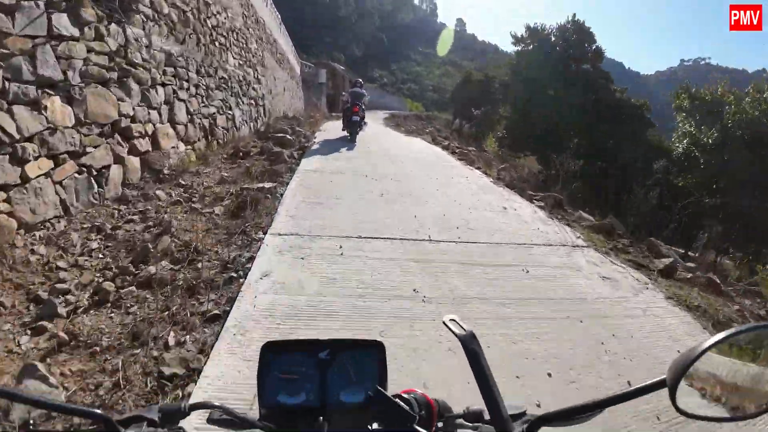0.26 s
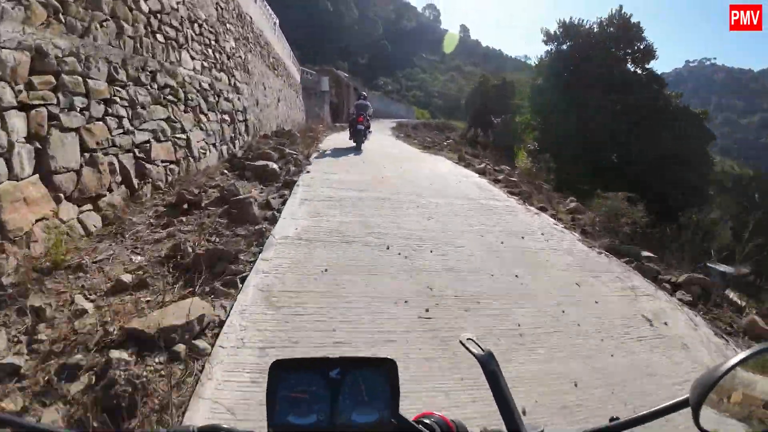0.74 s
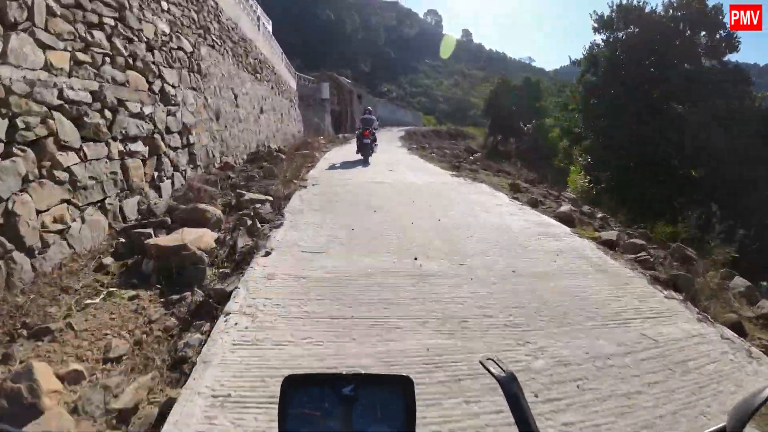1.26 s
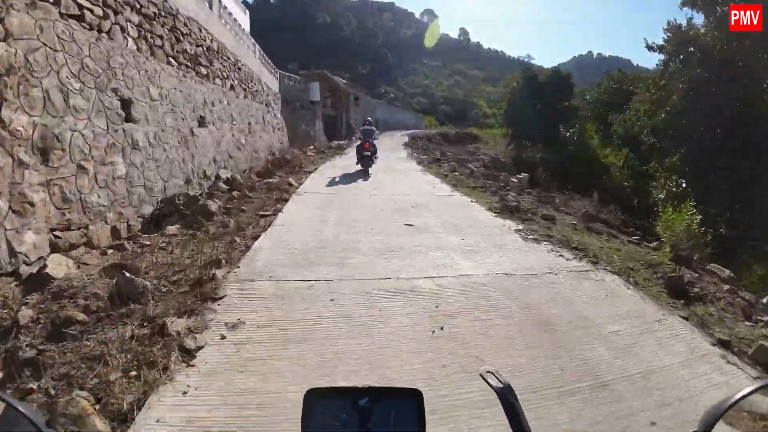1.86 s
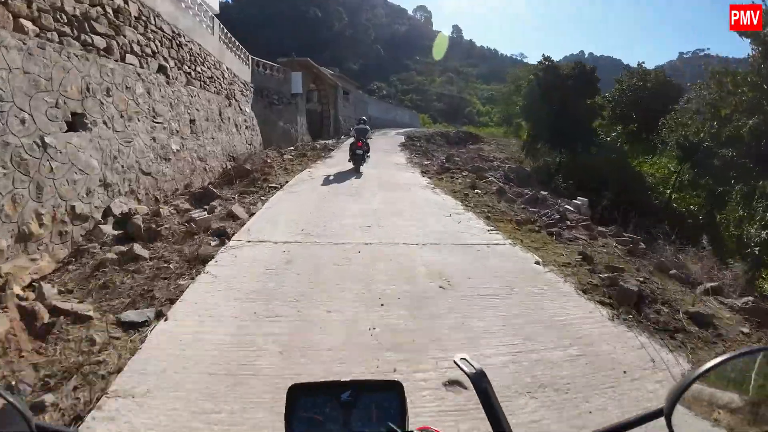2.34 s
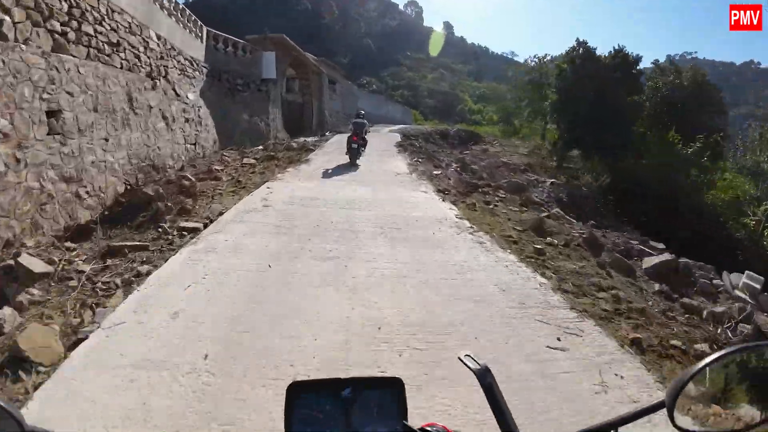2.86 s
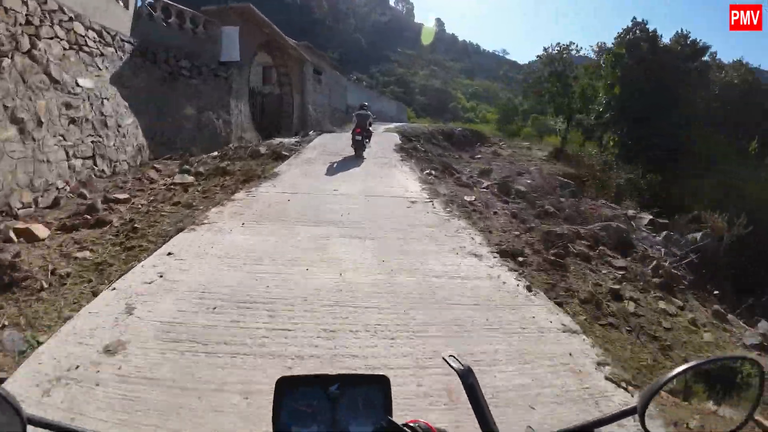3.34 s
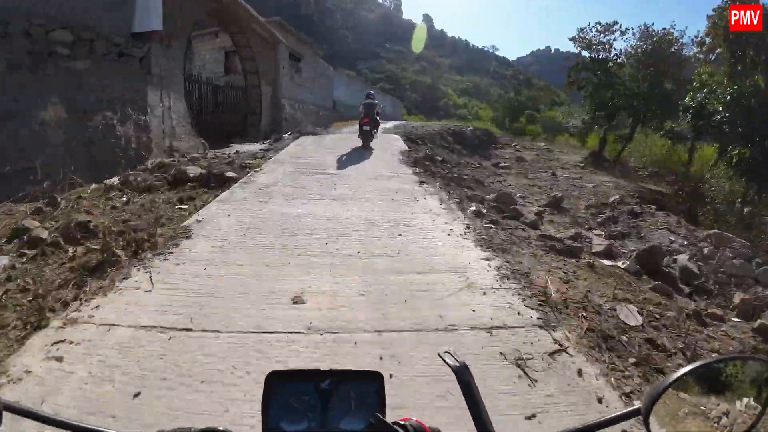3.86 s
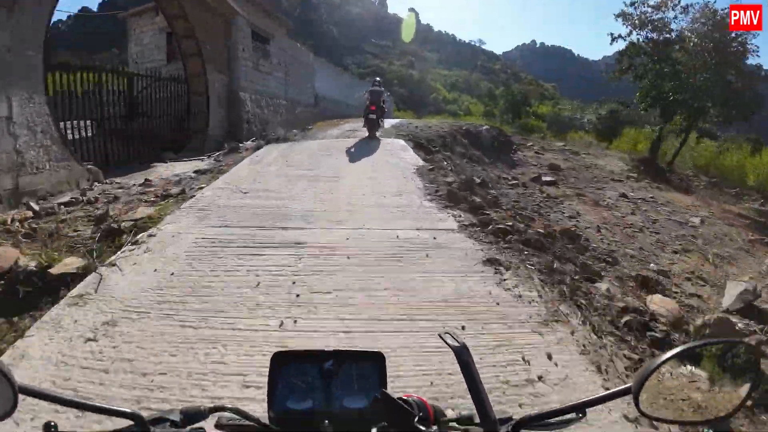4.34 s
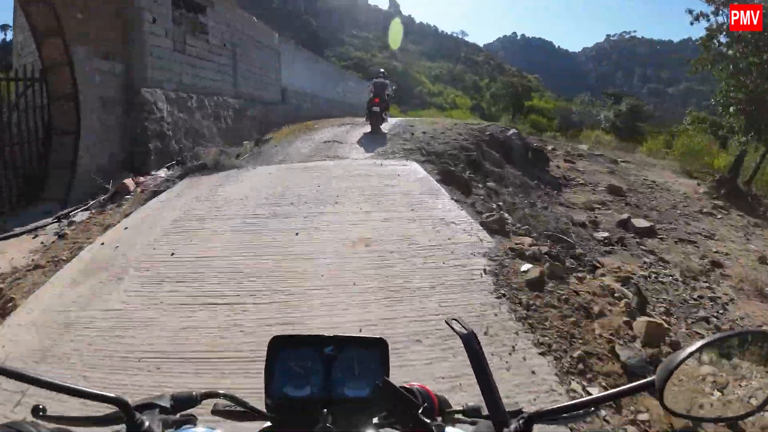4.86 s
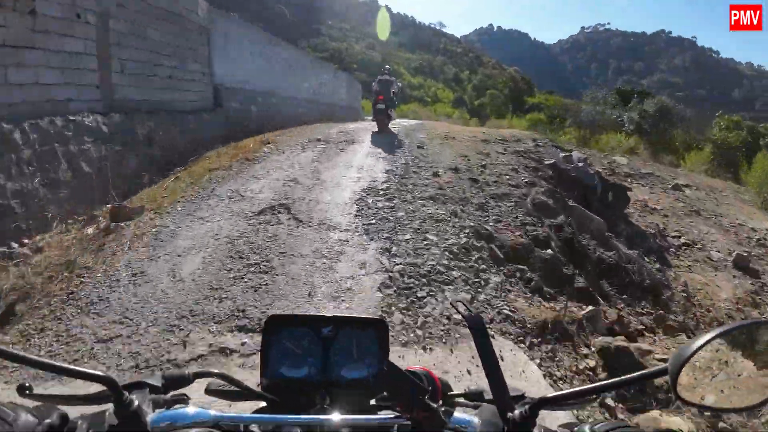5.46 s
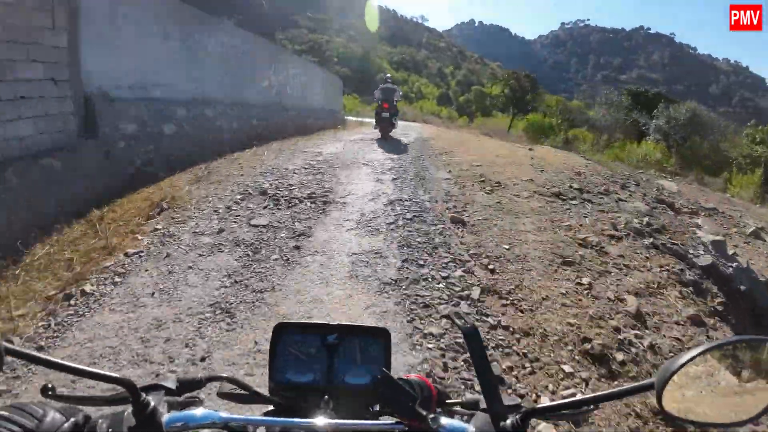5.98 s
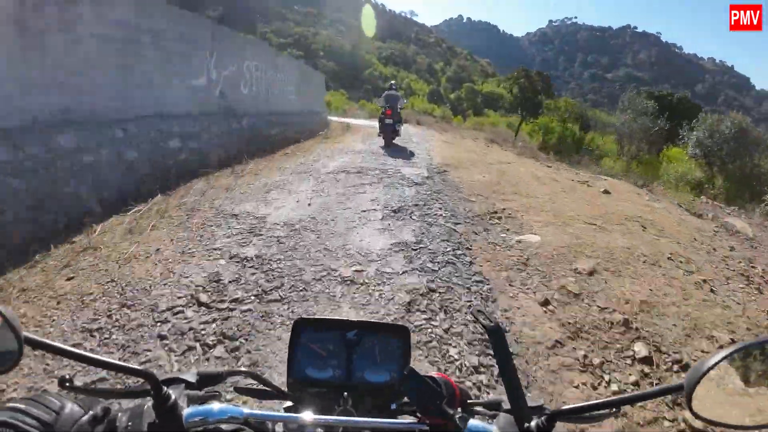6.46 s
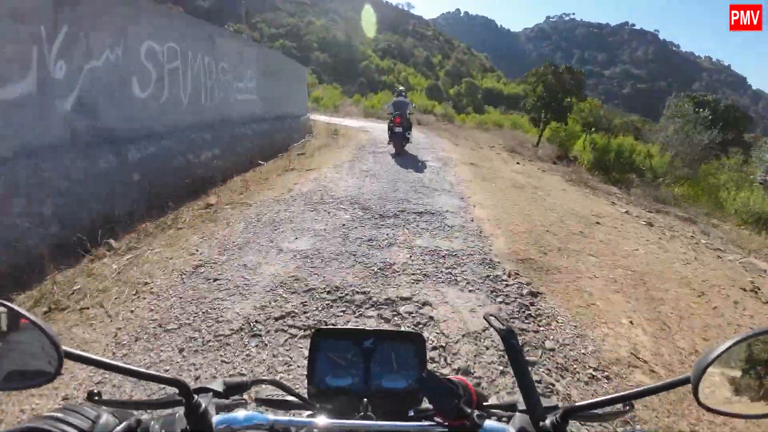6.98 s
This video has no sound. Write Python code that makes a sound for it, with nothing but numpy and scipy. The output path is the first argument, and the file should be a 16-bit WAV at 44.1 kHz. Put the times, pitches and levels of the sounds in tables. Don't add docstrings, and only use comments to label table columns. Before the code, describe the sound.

A small four-stroke single-cylinder motorcycle is heard close, from on board, in mono with a dulled, housed-camera tone. From 0 to 1.5 s the fast, throbbing exhaust revs up, growing louder and raspier. At about 1.55 s the throttle shuts: the bark drops out, leaving a hollow boom and singing cam chain as pitch slides down until about 2.3 s, with a brief rough falter near 2.1 s. The engine then pulls again with a fuller bark, rising gently until around 4.4 s, easing off with small stumbles, and sinking to a slightly uneven putter. Valve clatter, tappet ticks, gear whine and airy hiss track its speed over low tyre rumble. From about 5.6 s fine gravel spatters; stones knock the mudguard in a cluster at 5.8 s, once faintly at 6.05 s, and harder from 6.8 to 7.05 s, with tiny metallic pings. The engine continues to the end, about 7.2 s.

```python
import sys
import numpy as np
from scipy import signal
from scipy.fft import rfft, irfft, next_fast_len
from scipy.io import wavfile
from scipy.ndimage import uniform_filter1d, map_coordinates

SR = 44100
rng = np.random.default_rng(int(sys.argv[2]) if len(sys.argv) > 2 else 0)


def to_wav(s):
    ch = np.atleast_2d(s).T
    pcm = np.round(np.clip(ch, -1, 1) * 32767)
    wavfile.write(sys.argv[1], SR, pcm.astype(np.int16))


def volts(x):
    e = np.asarray(x, float) / 20
    return 10 ** e


N = 318351

# (time [s], rate [firings/s])
SPEED = [(0, 40), (.16, 39.5), (.66, 46.2), (.94, 49.2), (1.45, 57.7), (1.55, 56.9), (1.69, 51.5),
         (2.01, 44.4), (2.27, 32.9), (2.45, 33.3), (2.93, 37.1), (3.6, 41), (3.82, 40.6), (4.37, 42.5),
         (5.2, 40), (5.67, 37.6), (6.62, 38), (7.22, 37.2)]
# (time [s], load [dB])
LOAD = [(0, -30), (.1, -32.5), (.28, -28.5), (.45, -28), (.7, -26), (1, -28), (1.48, -23), (1.58, -37),
        (2.04, -38.5), (2.53, -27), (3.6, -27), (4.02, -33), (4.48, -31.5), (4.6, -39.5), (4.95, -36.5),
        (5.66, -36), (5.81, -29.5), (7.22, -34.5)]
# (time [s], roughness [0-1])
ROUGHNESS = [(0, .25), (.6, .12), (1.5, .1), (1.6, .15), (2, .2), (2.1, .45), (2.4, .2), (3.6, .13),
             (4.1, .22), (5.6, .3), (5.9, .22), (7.22, .28)]
# (time [s], length [s], throb loss [dB], boom loss [dB])
FALTERS = [(2.05, .05, 3, 13), (2.17, 0.057, 6, -0.7), (2.31, 0.035, 3, -0.5), (2.6, .3, -0.5, -2.5),
           (3.27, 0.21, 0.3, 3.5), (3.36, .04, 9, -0.5), (4.09, .07, 5, 3), (4.3, .04, 3.5, 2.5),
           (4.4, 0.035, 4, 1.5), (4.55, 0.033, 3, 1), (4.67, 0.017, 5, 7), (4.78, 0.054, -1, 4),
           (4.86, 0.019, 21, 8), (5.07, 0.11, 5, 3.5), (5.53, 0.11, 11, 2.5), (5.68, .07, 5, 2.5),
           (5.8, 0.048, 5, -2.5), (6.03, 0.046, 2, 1.5), (6.38, 0.067, 4, 1.5), (6.51, .04, 6, .6),
           (6.64, 0.053, 9, 1.5), (7.04, 0.26, 5, 1.5)]
# (frequency [Hz], level [dB])
PIPE_BOOM = [(40, -120), (70, -45), (105, -13), (128, -5), (152, 0), (172, -2), (195, -11), (228, -10),
             (262, -50), (400, -120)]
PIPE_BARK = [(120, -120), (190, -40), (222, -7), (250, -3), (290, 0), (335, -1), (372, -9), (405, -22),
             (450, -50), (700, -120)]
PIPE_RASP = [(250, -120), (370, -40), (420, -8), (455, -2), (510, -2), (565, 0), (625, 1), (690, -8),
             (780, -12), (1000, -14), (1300, -22), (1600, -50), (2500, -120)]
# (multiple of firing rate [1], level [dB])
CHAIN_LINES = [
    (11, -48),
    (15, -45),
    (14, -52),
]
# (frequency [Hz], density [dB per Hz])
CASING = [(510, -9.5), (860, 2), (902, -9), (986, -1.5), (1140, -11.5), (1240, -9), (1620, -7),
          (2160, -10.5), (2510, -13), (2780, -13.5), (3510, -22.5), (4400, -58), (5720, -74), (9680, -120)]
# (frequency [Hz], width [Hz], level [dB])
FINS = [(1250, 140, 1), (1420, 210, 1.5), (2334, 110, -9), (2750, 140, -0.5), (2870, 1170, -11)]
# (frequency [Hz], level [dB])
GEAR_COVER = [(1500, -62), (2000, -32), (2600, 3.5), (2850, 1.5), (3100, 5), (3400, -9), (3800, -20),
              (4300, -22), (6000, -60)]
# (frequency [Hz], density [dB per Hz])
TAPPET_TONE = [(2500, -62), (3300, -7.5), (3700, -0.5), (4100, -1.5), (5000, -6.5), (5800, -1.5),
               (6400, -8.5), (7200, -19), (9000, -63)]
# (frequency [Hz], density [dB per Hz])
HISS_TONE = [(4500, -60), (6000, -14), (6800, -1.5), (8500, -3), (9860, -4), (10900, 0), (12500, -1.5),
             (14100, -1), (15700, -3), (16100, -60)]
# (time [s], length [s], level [dB])
JOLTS = [(.01, .015, 1), (.35, .15, 3.5), (1.22, 0.1, 2.5), (1.45, 0.033, 2), (1.75, .025, 5),
         (4.45, 0.039, -1.5), (5.81, 0.026, 0), (6.79, 0.033, 3), (7.04, .04, 1), (7.18, 0.025, 4),
         (7.22, .015, 6)]
# (time [s], peak [dB], frequency [Hz])
KNOCKS = [
    (5.7994, -47, 1400),
    (5.8303, -37, 1560),
    (5.8576, -39.5, 1400),
    (6.0462, -42.5, 1610),
    (6.788, -36, 1610),
    (6.9062, -36.5, 1430),
    (6.971, -39, 1420),
    (7.0453, -38, 1710),
]
# (time [s], peak [dB], decay t60 [s])
PINGS = [
    (.1815, -65, .1),
    (1.7325, -66, .1),
    (1.8567, -66, .15),
    (1.9465, -64, .05),
    (5.6705, -63, .25),
    (6.5071, -64, .08),
    (6.789, -63, .25),
    (6.9406, -63, .1),
    (7.0943, -63, .2),
]
# (frequency [Hz], level [dB])
TUBE = [
    (8979, 0),
    (15643, -3),
    (10750, -10),
    (12600, -12),
]
# (time [s], peak [dB], frequency [Hz])
TICKS = [(0.1805, -55, 8990), (1.7325, -51, 8970), (1.946, -55, 9330), (2.0118, -54, 7470),
         (2.1266, -55, 11300), (2.3999, -55, 7050), (3.5912, -55, 7080), (3.6651, -53, 8770),
         (3.7863, -54, 11200), (4.3625, -55, 8000), (4.4558, -56, 7150), (5.67, -56, 8980),
         (5.8057, -56, 7100), (6.2053, -55, 14500), (6.2272, -54, 10900), (6.4358, -54, 11300),
         (6.6842, -54, 11200), (6.757, -53, 7310), (6.7865, -54, 8980), (6.9456, -57, 8980),
         (7.0165, -53, 11200)]
# (frequency [Hz], density [dB per Hz])
ROAD = [(10, -15), (25, -20), (60, 2), (150, -5.5), (350, -4.5), (700, -11), (1100, -55)]

CRUISE_HZ, CRUISE_DB = 40, -30
# (level at cruise [dB], slope [dB per dB of load], slope [dB per octave of speed])
THROB_LAW, BOOM_LAW = (-28.5, 0.19, 11), (-29, 0.23, 3.4)
BARK_LAW, RASP_LAW = (-30, 1.27, 0.093), (-39, 0.47, 11)
CLATTER_LAW, TAPPET_LAW, HISS_LAW = (-49, 0.32, 9.3), (-69, .45, 9.3), (-69.5, .55, 12)
SHUT_FROM_S, SHUT_TO_S, SHUT_EDGE_S = 1.545, 2.02, 0.017
SHUT_THROB_DB, SHUT_BOOM_DB, SHUT_BEAT_DB, SHUT_CHAIN_DB, SHUT_RASP_DB = -6.5, 4, -3, 5.5, -3
GULP_AT = 0.4423
GULP_FROM_DB, GULP_FULL_DB = -40, -27
GEAR_TEETH = 72.6
GRAVEL_S, GRIT_PER_S, GRIT_DB = 5.6, 30, -68
HUNT_HZ, HUNT_PER_S, HUNT_FROM_S = .3, 7, 3.7


def exhaust(cycle):
    boom_db = obeys(BOOM_LAW) - humps(FALTERS)[1] + SHUT_BOOM_DB * overrun()
    bark_db = obeys(BARK_LAW)
    rasp_db = obeys(RASP_LAW) + SHUT_RASP_DB * overrun()
    rough = curves(ROUGHNESS)[0]
    fire = np.flatnonzero(np.diff(np.floor(cycle)))
    luck = rng.standard_normal((len(fire), 4))
    late = np.round(.0006 * SR * rough[fire] * luck[:, 0]).astype(int)
    fire = np.clip(fire + late, 0, N - 1)
    gulp = np.minimum(fire[:-1] + (GULP_AT * np.diff(fire)).astype(int), N - 1)
    gulp_size = np.clip((bark_db - GULP_FROM_DB) / (GULP_FULL_DB - GULP_FROM_DB), 0, 1)
    # (answer, level [dB], centre [Hz], width [Hz], phase turns, gas share, echo share, gulp share)
    parts = [(PIPE_BOOM, boom_db, 165, 60, 1.21, .3, 0, .12),
             (PIPE_BARK, bark_db, 330, 70, 6.9, .5, 0, 0.4),
             (PIPE_RASP, rasp_db, 900, 250, 17.21, 1.1, .5, 0.3)]
    sound = np.zeros(N)
    for k, (answer, level_db, centre_hz, width_hz, turns, gas, echo, gulp_share) in enumerate(parts):
        blows = np.zeros(N)
        blows[fire] = volts(4 * rough[fire] * luck[:, k + 1])
        blows[gulp] = gulp_share * (blows * gulp_size)[fire[:-1]]
        drive = unit(blows) + gas * rough * unit(gated(cycle, at=0.73, sharp=3.0))

        def pipe(hz):
            ring = np.exp(-1j * turns * np.arctan((hz - centre_hz) / width_hz))
            return along(answer, hz) * ring * (1 + echo * np.exp(-2j * np.pi * hz * .0072))

        sound += volts(level_db) * even(filtered(drive, pipe))
    return sound


def crank_throb(cycle):
    rough = curves(ROUGHNESS)[0]
    throb_db = obeys(THROB_LAW) - humps(FALTERS)[0] + SHUT_THROB_DB * overrun()
    throb_db = throb_db - .4 + 3 * rough * wobble(18)
    throb = volts(throb_db) * np.cos(2 * np.pi * (2 * cycle + 0.17) + 1.1 * rough * wobble(14))
    beat_db = -37.5 + SHUT_BEAT_DB * overrun() + 2.2 * wobble(5.0)
    beat = volts(beat_db) * np.cos(2 * np.pi * (cycle + 0.46))
    return np.sqrt(2) * (throb + beat)


def cam_chain(cycle):
    lines = np.zeros(N)
    for multiple, db in CHAIN_LINES:
        level = volts(db + 2.5 * wobble(4))
        lines += level * np.sin(2 * np.pi * multiple * cycle + .6 * wobble(12))
    return np.sqrt(2) * volts(SHUT_CHAIN_DB * overrun()) * filtered(lines, lambda hz: along(PIPE_RASP, hz))


def valve_clatter(cycle, shared):
    knocks = gated(cycle, at=0.31, sharp=4.9) + .5 * gated(cycle, at=0.58, sharp=0.55)
    knocks = (knocks + 0.86 * rng.standard_normal(N)) * volts(0.57 * shared)
    fins = unit(rung(knocks * volts(2.5 * wobble(4.64)), FINS))
    return unit(coloured(knocks, CASING) + 0.25 * fins)


def gear_whine(cycle):
    press = 1 + 0.88 * np.cos(2 * np.pi * (cycle - .2))
    mesh = np.sin(2 * np.pi * GEAR_TEETH * cycle + 2.2 * wobble(150))
    whine = press * volts(1.5 * wobble(6)) * mesh
    return volts(-14.5) * filtered(whine, lambda hz: along(GEAR_COVER, hz))


def tappets(cycle, shared):
    taps = gated(cycle, at=0.19, sharp=1.5) * volts(2.1 * shared) + 0.91 * rng.standard_normal(N)
    return coloured(taps, TAPPET_TONE)


def chain_and_air_hiss(cycle, shared):
    rattle = gated(cycle, at=0.29, sharp=6) * volts(1.3 * shared) + 0.66 * rng.standard_normal(N)
    return coloured(rattle * volts(1.5 * wobble(5.6)), HISS_TONE)


def machinery(cycle):
    shared = wobble(25)
    jolt_db = humps(JOLTS)[0]
    tappet_db = obeys(TAPPET_LAW) + 0.3 * jolt_db
    hiss_db = obeys(HISS_LAW) + 0.37 * jolt_db
    sound = volts(clatter_db() + 0.5) * (valve_clatter(cycle, shared) + gear_whine(cycle))
    sound += volts(tappet_db + 2.0) * tappets(cycle, shared)
    return sound + volts(hiss_db) * chain_and_air_hiss(cycle, shared)


def gravel():
    out, t = np.zeros(N + SR), np.arange(SR // 20) / SR
    for s, db, hz in KNOCKS:
        knock = np.sin(2 * np.pi * hz * t) + .08 * rng.standard_normal(len(t))
        out[round(s * SR):][:len(t)] += volts(db - 4 - 60 * t / .03) * knock
    gravel_length_s = N / SR - GRAVEL_S
    for when, pitch, size in rng.random((int(GRIT_PER_S * gravel_length_s), 3)):
        s = GRAVEL_S + when * gravel_length_s
        grain = np.sin(2 * np.pi * 4000 * 3.3 ** pitch * t)
        out[round(s * SR):][:len(t)] += volts(GRIT_DB + 9 * size - 60 * t / .012) * grain
    return out[:N]


def stones():
    out, t = np.zeros(N + SR), np.arange(SR // 2) / SR
    for s, db, t60 in PINGS:
        ring = np.zeros(len(t))
        for hz, level in TUBE:
            decay = volts(level + rng.normal(0, 5.3) - 60 * t / t60 * hz / 9000)
            ring += decay * np.sin(2 * np.pi * hz * t)
        out[round(s * SR):][:len(t)] += volts(db + 1.5) * (1 - np.exp(-t / .008)) * ring
    for s, db, hz in TICKS:
        tick = np.sin(2 * np.pi * hz * t) * volts(-60 * t / 0.014)
        tick += 0.44 * np.diff(rng.standard_normal(len(t) + 1)) * volts(-60 * t / .007)
        out[round(s * SR):][:len(t)] += volts(db - 8.5) * tick
    return out[:N]


def road_rumble():
    rumble = coloured(rng.standard_normal(N) * volts(0.86 * wobble(4.0)), ROAD)
    return volts(0.46 * clatter_db() - 15.0) * rumble


def clatter_db():
    return obeys(CLATTER_LAW) + 0.46 * humps(JOLTS)[0]


def obeys(law):
    cruise_db, per_load, per_octave = law
    load_db = curves(LOAD)[0] - CRUISE_DB
    octaves = np.log2(curves(SPEED)[0] / CRUISE_HZ)
    return cruise_db + per_load * load_db + per_octave * octaves


def overrun():
    t = np.arange(N) / SR
    return (np.tanh((t - SHUT_FROM_S) / SHUT_EDGE_S) - np.tanh((t - SHUT_TO_S) / SHUT_EDGE_S)) / 2


def humps(rows):
    s, length, *sizes = np.transpose(rows)
    t = np.arange(0, N + 100, 100) / SR
    bells = np.exp(-((t[:, None] - s) / length) ** 2)
    return [np.interp(np.arange(N) / SR, t, bells @ c) for c in sizes]


def curves(rows):
    s, *cols = np.transpose(rows)
    return [np.interp(np.arange(N) / SR, s, c) for c in cols]


def wobble(rate):
    return map_coordinates(rng.standard_normal(int(N * rate / SR) + 4), [np.arange(N) * rate / SR])


def gated(cycle, at, sharp):
    return np.exp(sharp * (np.cos(2 * np.pi * (cycle - at)) - 1)) * rng.standard_normal(N)


def filtered(x, response):
    m = next_fast_len(N + SR // 2)
    return irfft(rfft(x, m) * response(np.fft.rfftfreq(m, 1 / SR)), m)[:N]


def along(points, hz):
    f, db = np.transpose(points)
    return volts(np.interp(np.log(hz + 1), np.log(f + 1), db))


def coloured(x, spectrum):
    return unit(filtered(x, lambda hz: along(spectrum, hz)))


def rung(x, modes):
    def response(f):
        return sum(volts(db) * (1j * f * w / (c * c - f * f + 1j * f * w)) ** 2 for c, w, db in modes)
    return filtered(x, response)


def unit(x):
    return x / np.sqrt(np.mean(x ** 2) + 1e-20)


def even(x):
    power = uniform_filter1d(uniform_filter1d(x ** 2, size=3000), size=3000)
    return x / np.sqrt(np.abs(power) + 1e-12)


def scene():
    rough_ground = np.clip(np.arange(N) / SR - HUNT_FROM_S, .25, 1)
    firing_hz = curves(SPEED)[0] + HUNT_HZ * rough_ground * wobble(HUNT_PER_S)
    cycle = .4 + np.cumsum(firing_hz) / SR
    engine = exhaust(cycle) + crank_throb(cycle) + cam_chain(cycle) + machinery(cycle)
    return (engine + gravel() + stones() + road_rumble())[None]


def top_cut(x):
    return signal.sosfilt(signal.butter(12, 16100, fs=SR, output="sos"), x)


def record(dry):
    return top_cut(dry)


dry = scene()
out = record(dry)
to_wav(out)
```